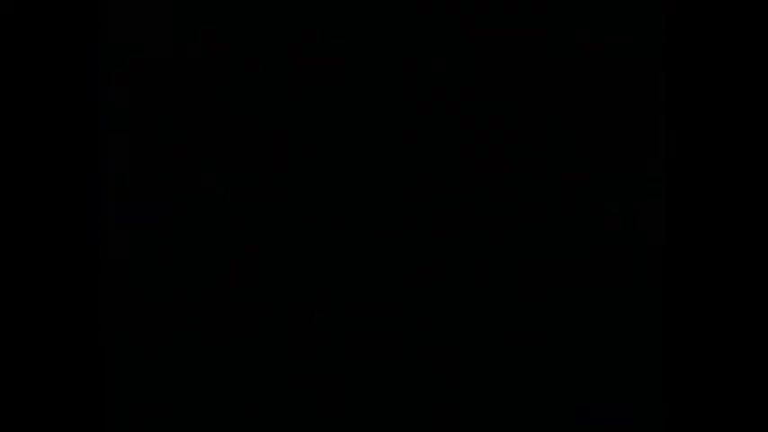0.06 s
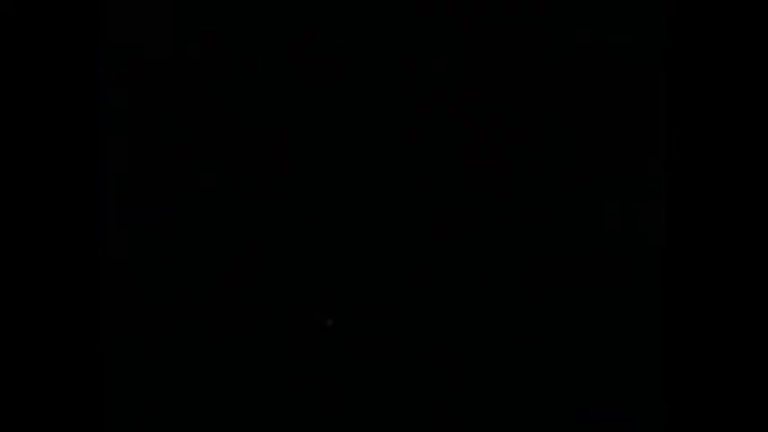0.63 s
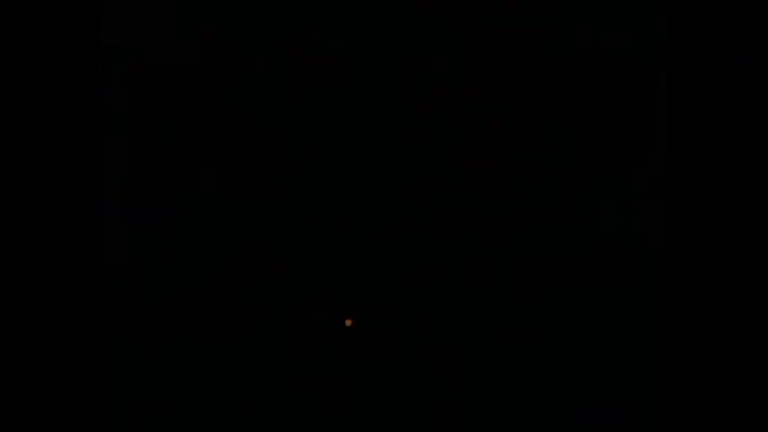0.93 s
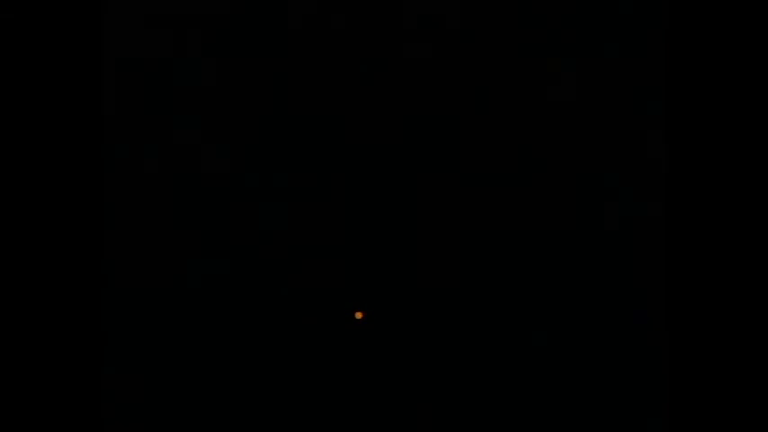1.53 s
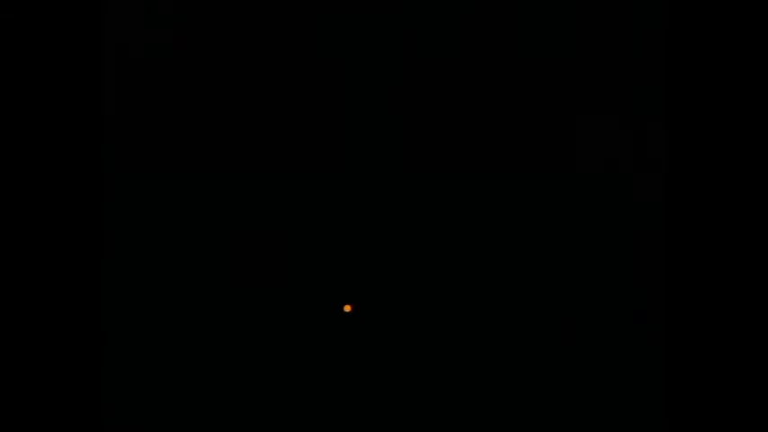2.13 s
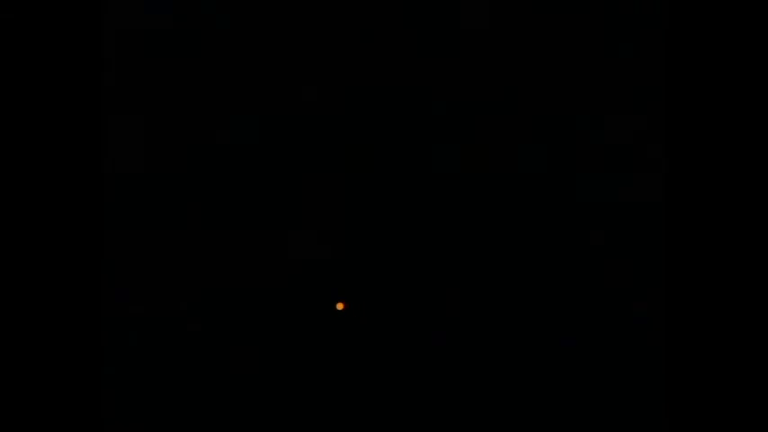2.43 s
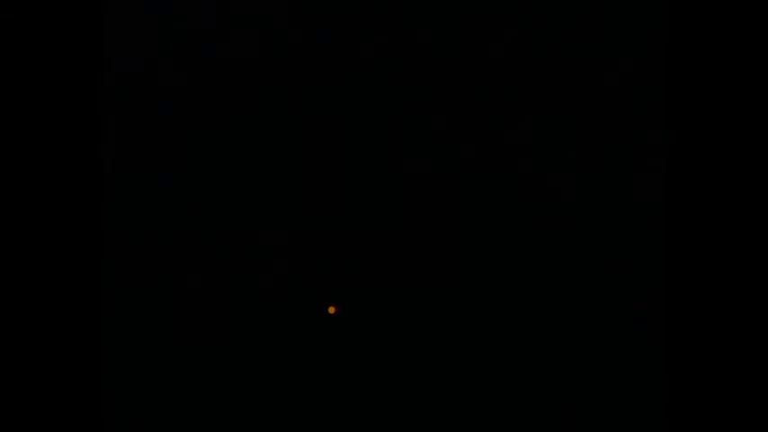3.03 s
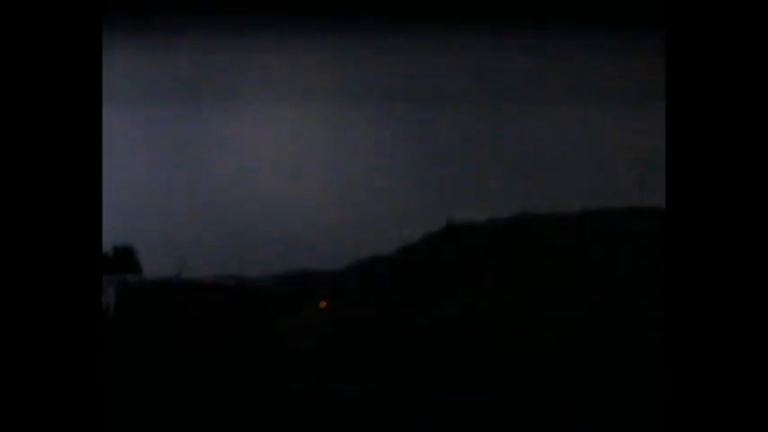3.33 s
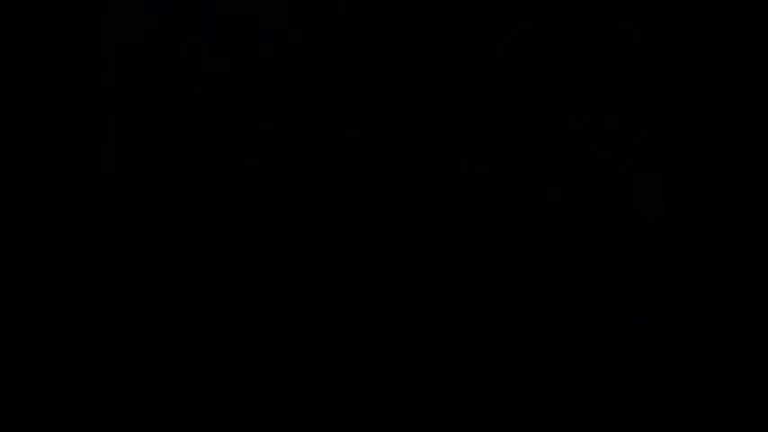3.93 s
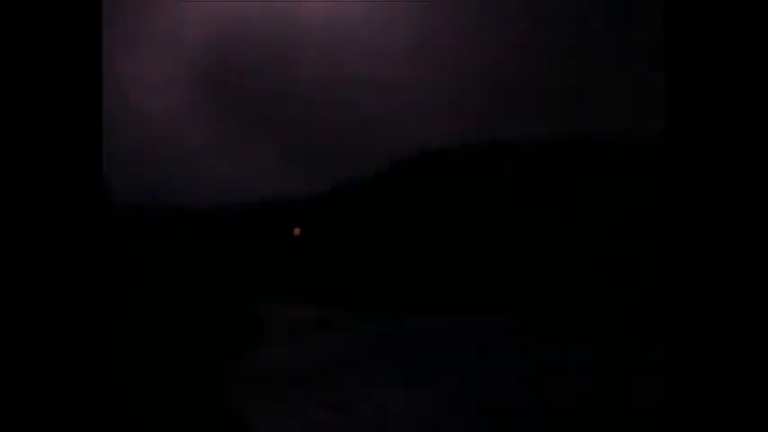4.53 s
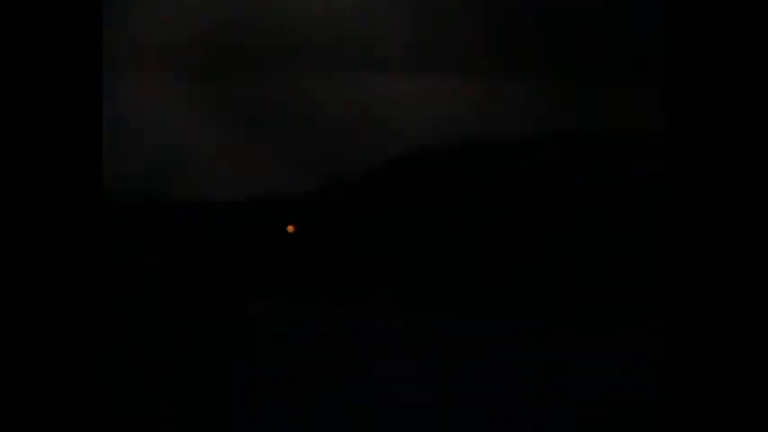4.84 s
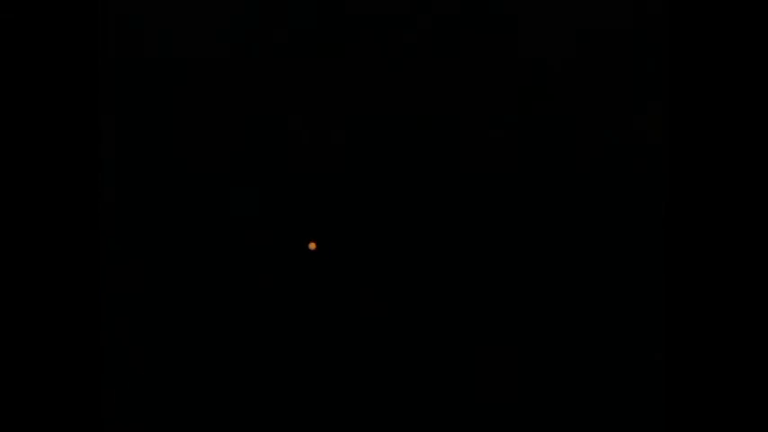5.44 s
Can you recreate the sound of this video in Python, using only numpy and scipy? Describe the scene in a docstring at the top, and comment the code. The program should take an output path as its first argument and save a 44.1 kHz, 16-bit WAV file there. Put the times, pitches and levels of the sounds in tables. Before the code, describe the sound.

Outdoors in steady rain, a low peal of thunder rolls and slowly fades while close drops splatter and tick on hard surfaces. In the lull, the rain hisses softly and a few hollow drips knock. Then a much nearer peal breaks with a string of hard, booming claps that briefly overload the microphone and push the rain down, as a second flurry of drops patters close by.

```python
"""Night thunderstorm in steady rain.

One peal rolls away, a crowd of shocks from a crooked lightning channel; then a nearer one breaks
with hard claps that overload the microphone and make its gain control duck the rain. Close by, rain
splatters in two flurries, with single sharp drops on hard surfaces and a few hollow drips.
Far off, countless impacts merge into a hiss."""
import sys
import numpy as np
from scipy import signal
from scipy.fft import rfft, irfft
from scipy.io import wavfile
from scipy.ndimage import uniform_filter1d

SR = 44100
rng = np.random.default_rng(int(sys.argv[2]) if len(sys.argv) > 2 else 0)


def to_wav(sig):
    """Store sig (one row per channel, or 1-D mono) as 16-bit WAV at the path in sys.argv[1].

    Samples outside -1..1 are clipped; the rate is SR.
    """
    pcm = np.clip(np.atleast_2d(sig), -1, 1) * 32767
    pcm = np.round(pcm).astype(np.int16)
    wavfile.write(sys.argv[1], SR, pcm.T)  # frames by channels


N = 250047
TIME = np.arange(N) / SR

# spectrum of near thunder: (frequency [Hz], level [dB])
NEAR_THUNDER_SPECTRUM = [(20, -34), (40, -29), (65, -11), (110, -2), (190, 0), (290, -0.5), (390, -3),
                         (520, -13.5), (620, -9.5), (780, -11), (1000, -18), (1300, -22.5), (2000, -35),
                         (3500, -59)]


def rumble():
    """Air absorption leaves thunder its bass: a far peal, a near one and higher surges from branches."""
    # spectra of the far peal and of the surges: (frequency [Hz], level [dB])
    far_spectrum = [(20, -47), (40, -24.5), (65, -9.5), (95, -8.5), (135, -1), (210, -0.5), (290, -4),
                    (400, -9), (520, -16), (750, -22.5), (1100, -35), (2000, -55)]
    surge_spectrum = [(30, -41), (70, -25.5), (120, -11), (200, -3.5), (290, -1.5), (370, -1), (460, -3.5),
                      (560, -16.5), (760, -16.5), (1200, -25.5), (2000, -37.5), (3500, -48.5)]
    far = roll("far", far_spectrum, rate=2500, spread_db=1.0, floor=undb(-32))  # a grumble lingers
    near = roll("near", NEAR_THUNDER_SPECTRUM, rate=1800, spread_db=1.0)
    surge = roll("surge", surge_spectrum, rate=2500, spread_db=2.0)
    return (far + near + surge) * undb(0.36 * wander(rate=12))


def roll(voice, spectrum, rate, spread_db, floor=0):
    """Incoherent addition: shocks from all along the crooked channel overlap, and their powers add."""
    # rolls of thunder: (time at full strength [s], level [dB], hold [s], fade [dB/s], voice)
    rolls = [(0.02, -18.5, .36, 18, "far"), (0.876, -24, .23, 68, "far"), (1.273, -27.5, .2, 11, "far"),
             (1.098, -31.5, .75, 21, "surge"), (3.158, -32, 0.14, 6, "far"), (4.448, -11.5, .3, 9, "near"),
             (4.658, -7, 0.31, 78.5, "near"), (5.25, -13, .45, 27.5, "surge"),
             (5.522, -10, .07, 60, "surge")]
    power = sum(envelope(*row, rise_db_per_s=321) ** 2 for *row, name in rolls if name == voice)
    return colour(impacts(rate, spread_db), spectrum) * np.sqrt(power + floor ** 2)


def claps():
    """Coherent addition: sound from a side-on stretch of channel arrives at once, in a few big swings."""
    # claps: (crest time [s], level [dB], pitch [Hz], half length [s], relative crack level [dB])
    arrivals = [(.281, -9.5, 172, 0.0044, -29), (1.076, -13, 188, 0.009, -33),
                (1.131, -11.5, 190, 0.0097, -33), (1.8, -19, 170, 0.012, -30),
                (4.446, 2, 221, 0.0096, -18.5), (4.472, 0, 236, .0048, -29), (4.639, 4.5, 208, 0.0029, -25),
                (4.659, 7.5, 170, 0.0091, -26), (4.913, 12, 269, 0.0047, -17),
                (4.968, 5.5, 274, 0.0054, -19.5), (4.984, 6.5, 266, 0.0028, -24),
                (5.177, 5.5, 215, 0.01, -23), (5.404, 5, 320, 0.0048, -26), (5.519, 1, 250, 0.0052, -25),
                (5.576, 4.5, 235, .0045, -25), (5.596, 3.5, 328, .004, -25)]
    # spectrum of the rough crack: (frequency [Hz], level [dB])
    crack_spectrum = [(350, -20), (560, 1), (760, 3.5), (1000, -5), (1300, -21), (2000, -25), (3500, -38)]
    out = np.zeros(N)
    crack = colour(rng.standard_normal(N), crack_spectrum)
    ragged_body = undb(-10.5) * colour(rng.standard_normal(N), NEAR_THUNDER_SPECTRUM)
    phases = rng.uniform(0, 2 * np.pi, len(arrivals))
    for (crest_s, db, hz, half_s, crack_db), phase in zip(arrivals, phases):
        span = np.abs(TIME - crest_s) < 10 * half_s
        t = TIME[span] - crest_s
        swing = np.cos(2 * np.pi * hz * t + phase)
        pressure = swing + ragged_body[span] + undb(crack_db) * crack[span]
        out[span] += undb(db) * pressure / np.cosh(2.17 * t / half_s)
    return out


def splatter():
    """Shot noise of close rain: each flurry of spray and ticks starts at a stroke, thins and gives out."""
    # spectrum of fine spray: (frequency [Hz], level [dB])
    spray_spectrum = [(300, -2), (800, 3.5), (1500, 2), (2500, 0.5), (4500, -2), (7500, -7), (13000, -5.5),
                      (16000, -10)]
    # flurries: (time at full strength [s], level [dB], hold [s], fade [dB/s])
    flurries = [(0, -31.5, 0.31, 12.5), (4.252, -30.5, 0.14, 4)]
    flurry_s, stop_db_per_s = 1.425, 57
    spray = colour(impacts(rate=14000, spread_db=1.5), spray_spectrum)
    ticks = patter(rate=240, spread_db=3.0, fade_s=0.00093)
    stray_drops = patter(rate=28, spread_db=2.1, fade_s=0.003)
    flow = undb(-59)  # a faint spray never stops
    for onset_s, db, hold_s, fade in flurries:
        giving_out = undb(-stop_db_per_s * np.maximum(TIME - onset_s - flurry_s, 0))
        flow = flow + envelope(onset_s, db, hold_s, fade, rise_db_per_s=2490) * giving_out
    flutter = undb(0.6 * wander(rate=25))
    return (undb(3) * spray + undb(-3) * ticks) * flow * flutter + undb(-60) * stray_drops


def patter(rate, spread_db, fade_s):
    """Small drops strike at random; each tick's energy decays exponentially as the drop breaks up."""
    # spectrum of a bright tick: (frequency [Hz], level [dB])
    tick_spectrum = [(1500, -19), (5000, -0.5), (12000, 2), (16000, -2.5)]
    breakup = np.exp(-TIME[:SR // 50] / fade_s)
    energy = np.abs(signal.fftconvolve(impacts(rate, spread_db) ** 2, breakup)[:N])
    return colour(np.sqrt(energy) * rng.standard_normal(N), tick_spectrum)


def drops():
    """Impact noise: a big drop slaps a hard surface, a tick and then a splash in the surface's band."""
    # single drops: (time [s], peak level [dB], band centre [Hz], splash time to fall 60 dB [s])
    strikes = [(.079, -13, 9000, 0.011), (0.086, -13.5, 9000, .014), (.1524, -14, 7000, .01),
               (0.2397, -7.5, 3650, 0.05), (.24, -5, 11000, 0.0054), (.326, -8, 12900, .02),
               (.3508, -8, 6050, .028), (.3634, -9.5, 8000, .012), (.395, -12, 6500, .009),
               (.4047, -9, 11100, .01), (0.4408, -11, 9100, .008), (.632, -13.5, 5500, 0.019),
               (0.6446, -11, 10900, .01), (0.7551, -9, 9500, .011), (0.7645, -8.5, 7050, 0.017),
               (.7796, -8, 14200, .014), (.805, -18, 3200, 0.24), (.8272, -12, 10000, .012),
               (.8668, -13.5, 9000, .011), (1.0184, -13, 12000, .01), (2.708, -19.5, 13000, 0.035),
               (4.2925, -15, 12200, .011), (4.365, -13, 13600, .008), (4.5331, -4.5, 11600, 0.024),
               (4.6107, -7.5, 12400, 0.0089), (4.6912, -13, 5500, .013), (4.7755, -9, 13500, .012),
               (4.8828, -8, 11050, .011), (4.9678, -11, 7600, 0.011), (5.4882, -14, 8000, .008),
               (5.648, -9, 10900, .01)]
    tick_s, splash_db = 0.00027, -10
    out, t = np.zeros(N), TIME[:SR // 10]
    for onset_s, db, hz, t60 in strikes:
        decay = np.exp(-t / tick_s) + undb(splash_db - 60 * t / t60)
        band = signal.butter(3, [hz * 0.56, min(hz * 1.62, SR * 0.45)], "bandpass", fs=SR, output="sos")
        slap = signal.sosfilt(band, rng.standard_normal(len(t)) * decay)
        add(out, onset_s + 0.0008, undb(db) * slap / np.abs(slap).max())
    return out


def drips():
    """Damped resonance: gathered water drips on something hollow, which rings for a few cycles."""
    # hollow drips: (time [s], level [dB], pitch [Hz])
    knocks = [(1.569, -14.5, 1140), (1.794, -22.5, 1080), (2.528, -15.5, 1110), (2.736, -26, 1070)]
    rise_s = 0.0012
    out, t = np.zeros(N), TIME[:SR // 50]
    pulse = (t / rise_s * np.exp(1 - t / rise_s)) ** 2
    for onset_s, db, hz in knocks:
        add(out, onset_s - 0.0004, undb(db - 2.5) * pulse * np.sin(2 * np.pi * hz * t))
    return out


def far_rain():
    """Superposition: countless distant drops merge into Gaussian noise, dulled by air absorption."""
    # strength of the distant rain: (time [s], level [dB])
    levels = [(0, -40.5), (1.7, -41.5), (2.8, -40), (4.2, -37.7), (5.67, -39)]
    # spectrum of its hiss: (frequency [Hz], level [dB])
    hiss_spectrum = [(300, -3), (700, 0), (1200, -0.5), (2400, -2.5), (3600, -5), (5000, -8.5), (7000, -14),
                     (10000, -19), (16000, -24)]
    db = np.interp(TIME, *np.transpose(levels)) + 0.4 * wander(rate=9.8)
    return colour(rng.standard_normal(N), hiss_spectrum) * undb(db)


def gain_control(x):
    """Compression: loud thunder turns the gain down a moment late; it recovers in a quick and a slow stage."""
    threshold_db, sense_s = -14, 0.052
    retention = np.exp(-1 / (sense_s * SR))
    power = signal.lfilter([1 - retention], [1, -retention], x ** 2)
    excess_db = 10 * np.log10(np.maximum(power / undb(threshold_db) ** 2, 1))

    def held_excess(release_db_per_s):
        """Peak hold with a release that is linear in dB."""
        release = release_db_per_s * TIME
        return np.maximum.accumulate(excess_db + release, axis=-1) - release

    return x * undb(-0.23 * held_excess(150) - 0.53 * held_excess(6))


def envelope(full_s, db, hold_s, fade_db_per_s, rise_db_per_s):
    """Exponential growth to full strength at full_s, a hold, then exponential decay."""
    rise_db = rise_db_per_s * np.maximum(full_s - TIME, 0)
    fade_db = fade_db_per_s * np.maximum(TIME - full_s - hold_s, 0)
    return undb(db - rise_db - fade_db)


def impacts(rate, spread_db):
    """Poisson process: on average `rate` impulses a second, many small and few large, at rms 1."""
    hit = rng.random(N) < rate / SR
    size = undb(spread_db * np.minimum(rng.exponential(size=N), 2 * np.pi))
    return unit(hit * size * rng.choice([-1, 1], N))


def wander(rate):
    """Random fluctuation at rms 1: a moving average joins `rate` new values a second."""
    step = int(SR / rate)
    stairs = np.repeat(rng.standard_normal(N // step + 1), step)[:N]
    return unit(uniform_filter1d(stairs, step))


def colour(x, spectrum):
    """Minimum-phase filtering to a spectrum of (frequency [Hz], level [dB]); output at rms 1."""
    size = 8192
    hz, db = np.transpose(spectrum)
    bin_hz = np.arange(size // 2 + 1) * SR / size
    gain = undb(np.interp(np.log(bin_hz + 1), np.log(hz), db))
    cepstrum = irfft(np.log(gain))
    cepstrum[1:size // 2] *= 2  # folding the cepstrum makes the filter causal
    cepstrum[size // 2 + 1:] = 0
    impulse_response = irfft(np.exp(rfft(cepstrum)))
    return unit(signal.fftconvolve(x, impulse_response)[:N])


def undb(db):
    """Decibels to amplitude ratio."""
    return 10 ** (np.asarray(db) / 20)


def unit(x):
    """Normalisation to rms 1."""
    return x / np.sqrt(np.mean(x ** 2))


def add(out, onset_s, sound):
    """Superpose a sound from onset_s on."""
    start = max(int(onset_s * SR), 0)
    out[start:start + len(sound)] += sound[:N - start]


def scene():
    """Linear superposition of thunder and of far and near rain, in one channel."""
    return (rumble() + claps() + far_rain() + splatter() + drops() + drips())[None]


def record(dry):
    """Overload: the gain ducks under the thunder, yet the loudest claps clip; a low-pass cuts the top."""
    clipped = np.clip(gain_control(dry), -1, 1)
    top_hz = 16000
    return signal.sosfilt(signal.ellip(10, 0.1, 80, top_hz, fs=SR, output="sos"), clipped)


dry = scene()
out = record(dry)
to_wav(out)
```